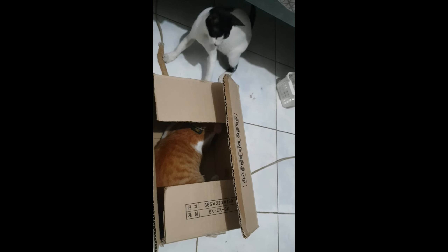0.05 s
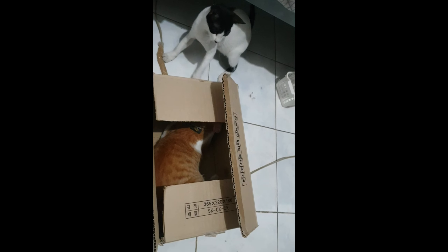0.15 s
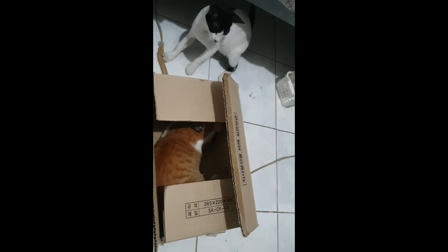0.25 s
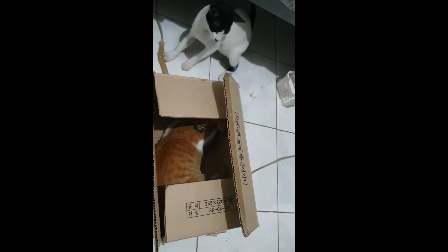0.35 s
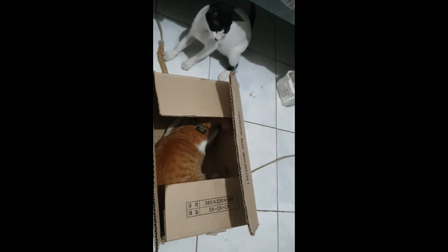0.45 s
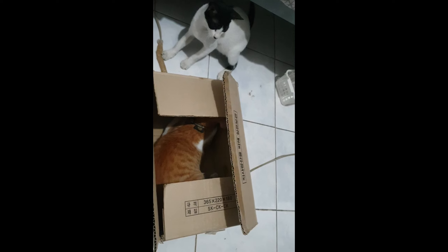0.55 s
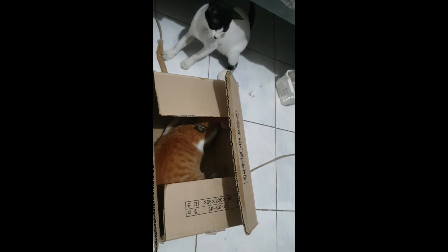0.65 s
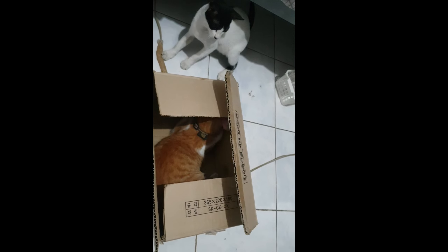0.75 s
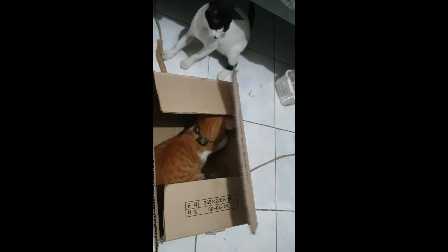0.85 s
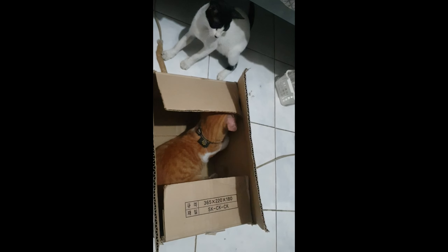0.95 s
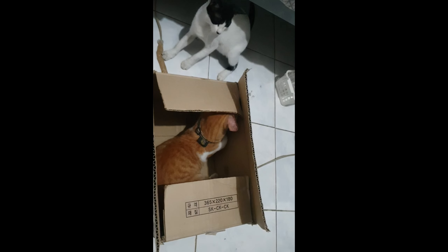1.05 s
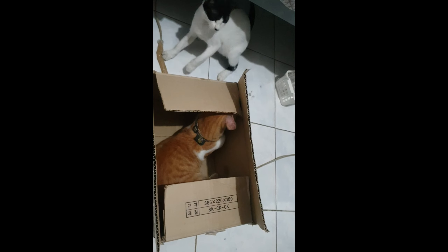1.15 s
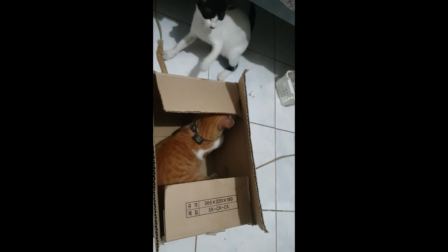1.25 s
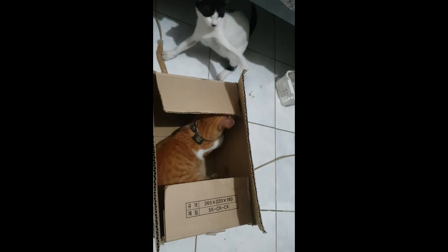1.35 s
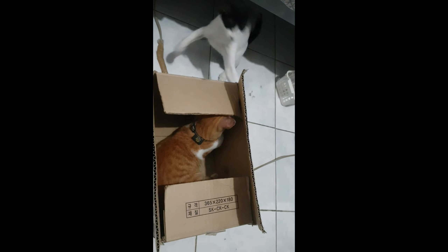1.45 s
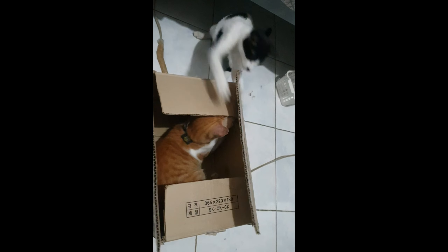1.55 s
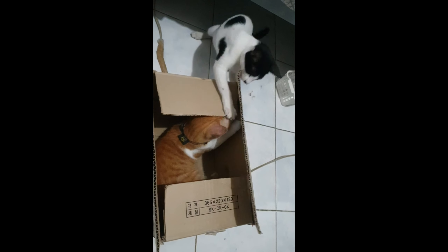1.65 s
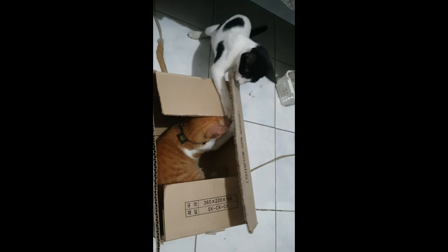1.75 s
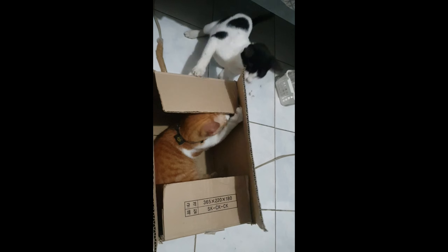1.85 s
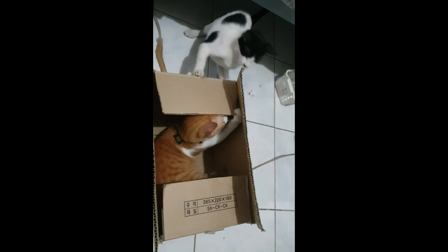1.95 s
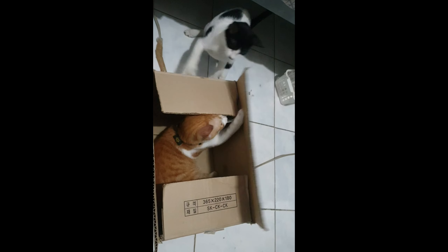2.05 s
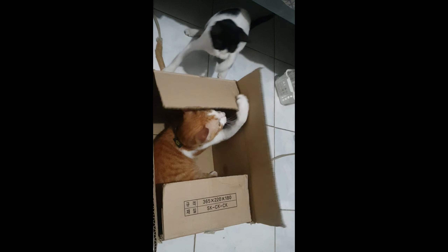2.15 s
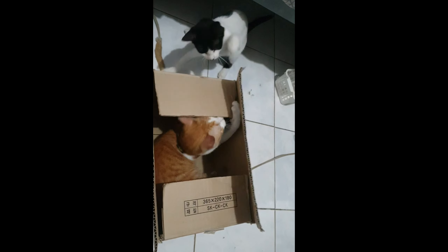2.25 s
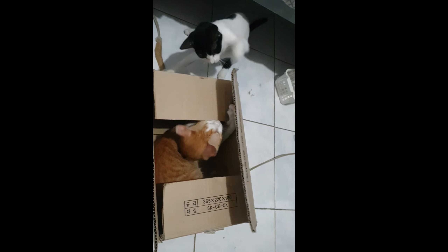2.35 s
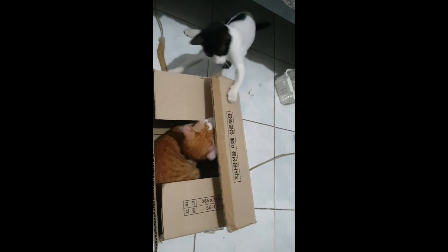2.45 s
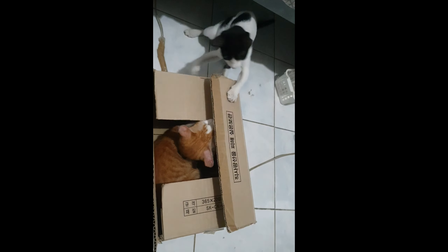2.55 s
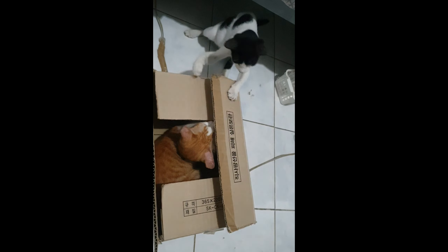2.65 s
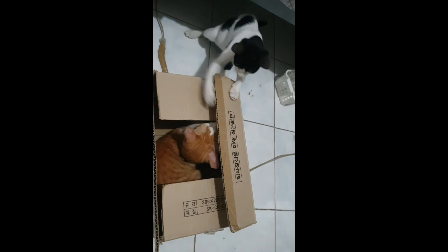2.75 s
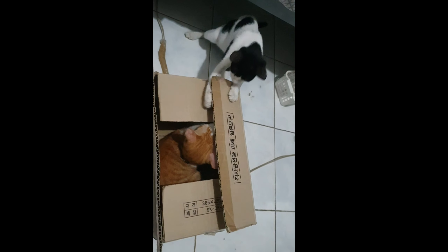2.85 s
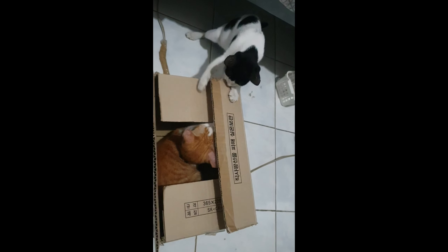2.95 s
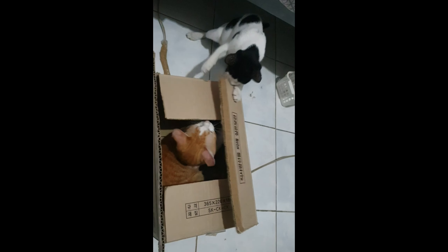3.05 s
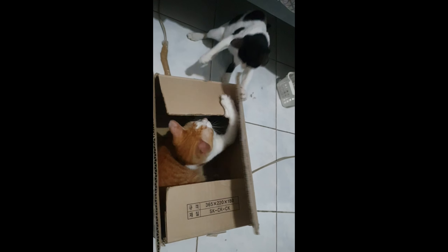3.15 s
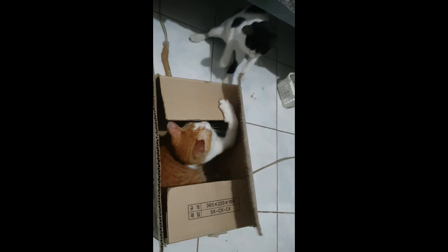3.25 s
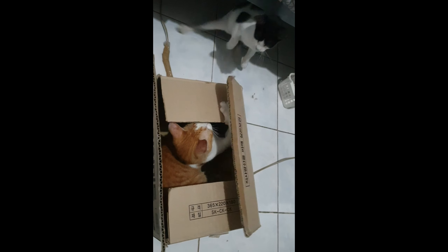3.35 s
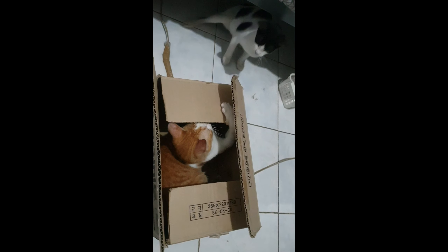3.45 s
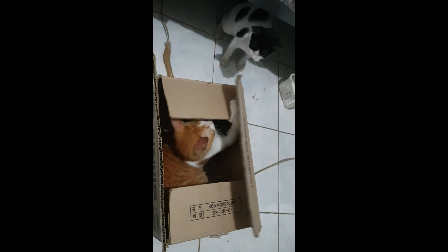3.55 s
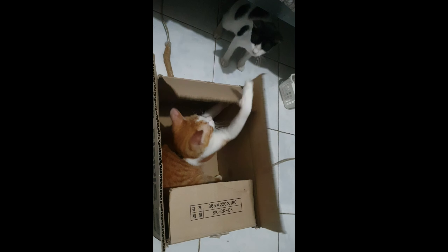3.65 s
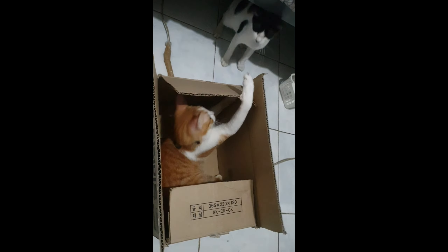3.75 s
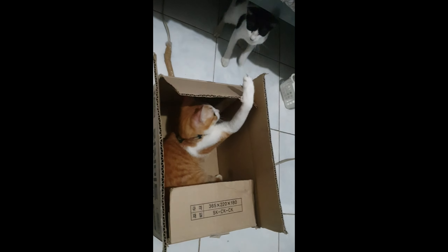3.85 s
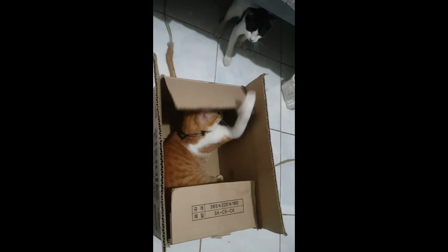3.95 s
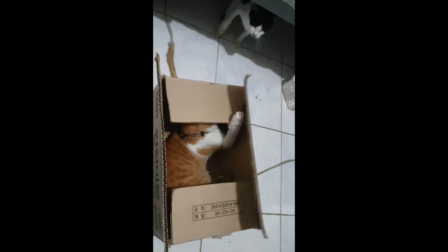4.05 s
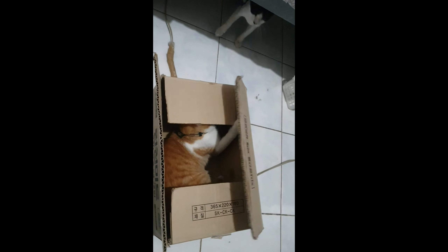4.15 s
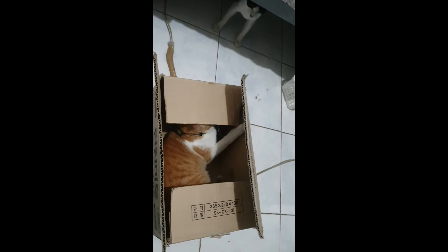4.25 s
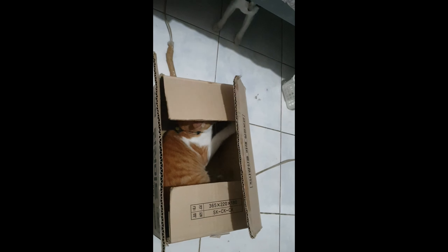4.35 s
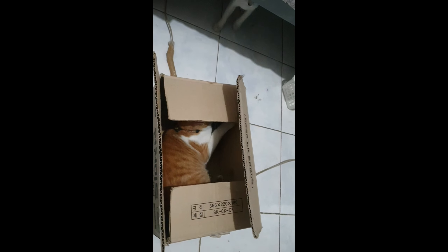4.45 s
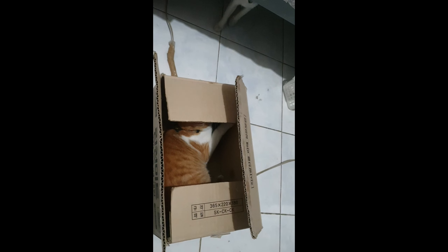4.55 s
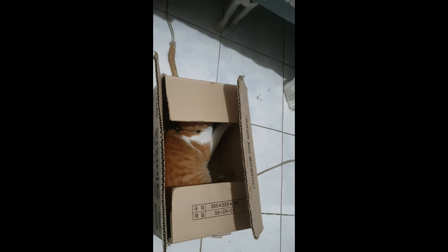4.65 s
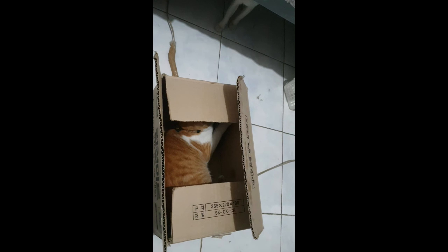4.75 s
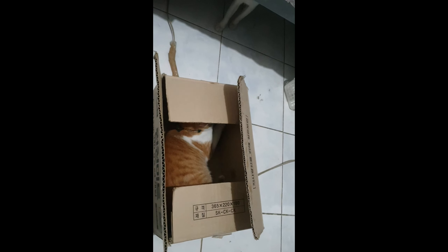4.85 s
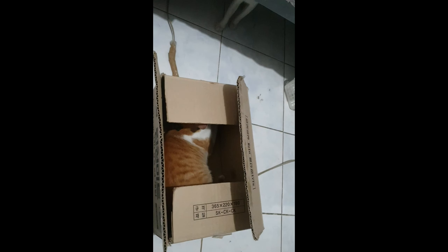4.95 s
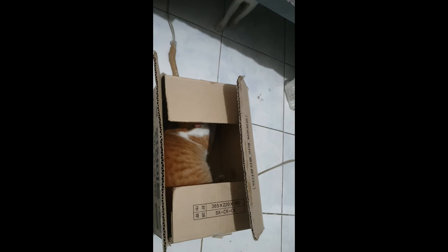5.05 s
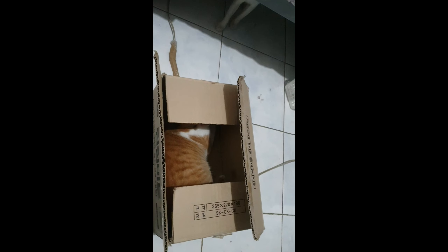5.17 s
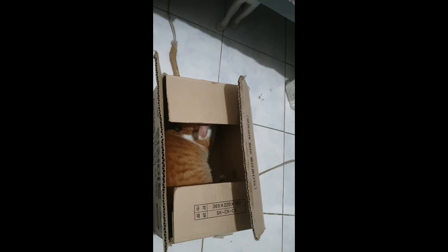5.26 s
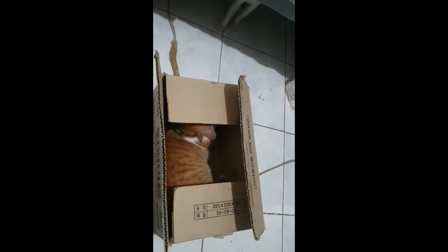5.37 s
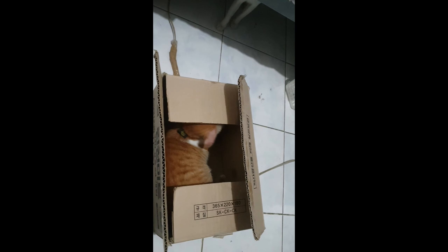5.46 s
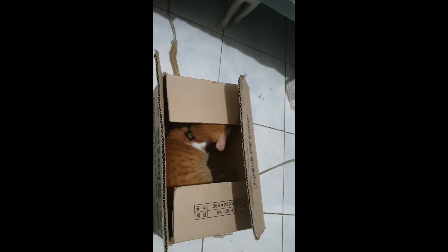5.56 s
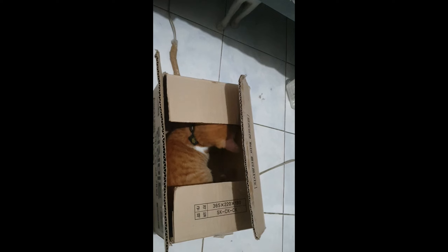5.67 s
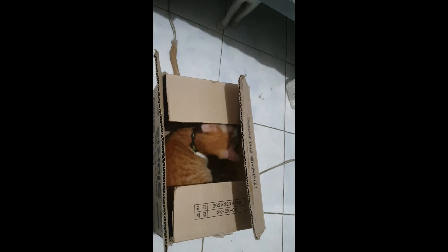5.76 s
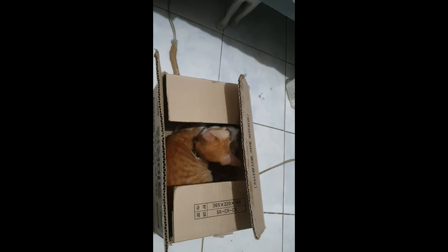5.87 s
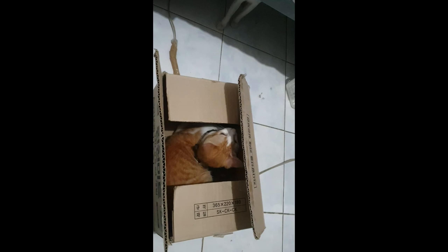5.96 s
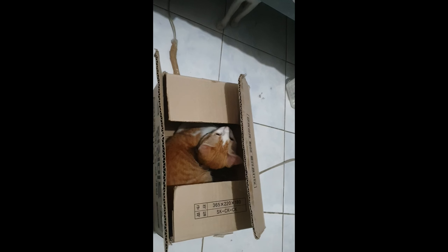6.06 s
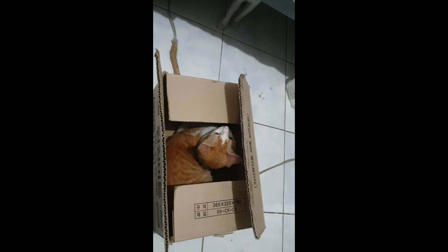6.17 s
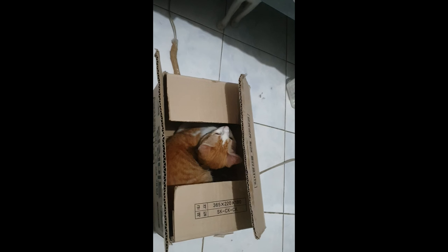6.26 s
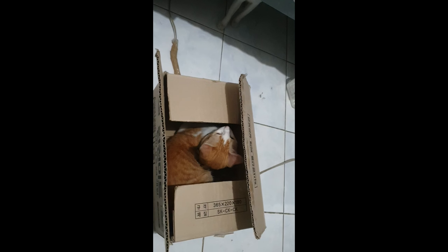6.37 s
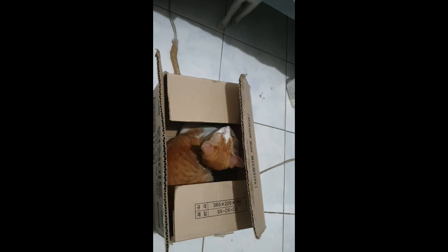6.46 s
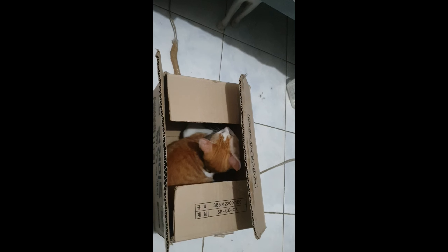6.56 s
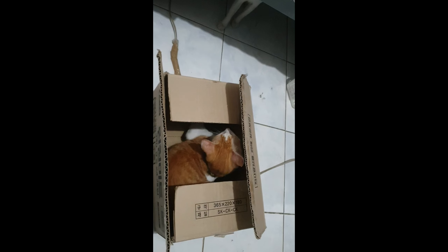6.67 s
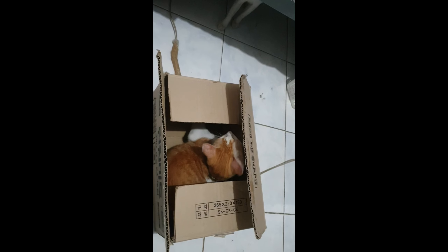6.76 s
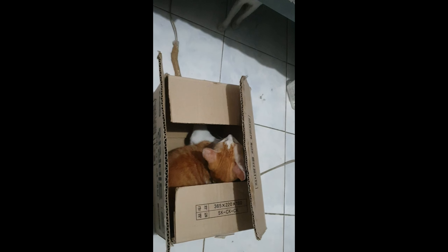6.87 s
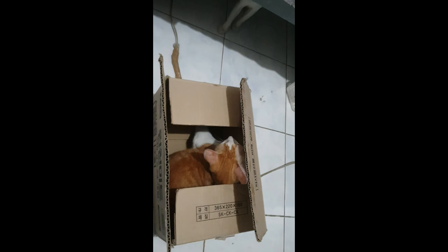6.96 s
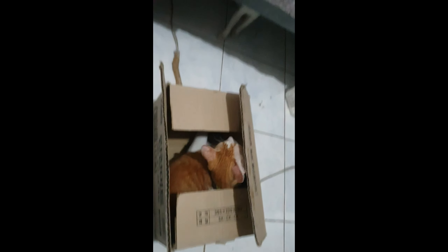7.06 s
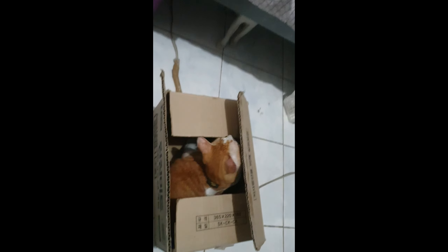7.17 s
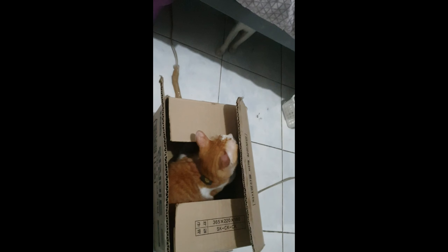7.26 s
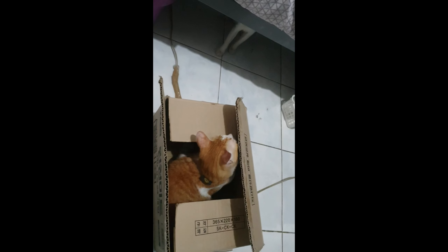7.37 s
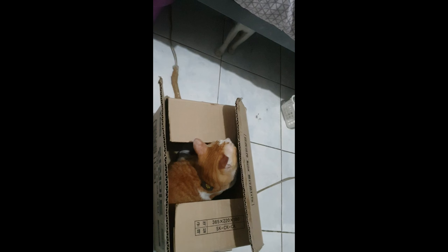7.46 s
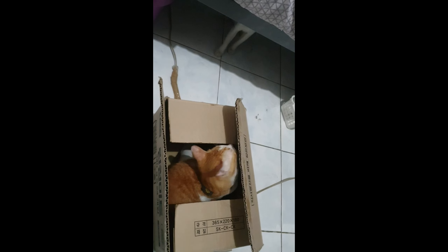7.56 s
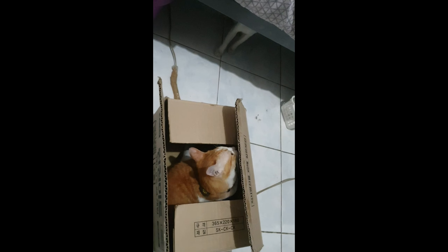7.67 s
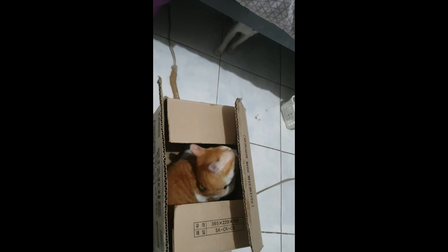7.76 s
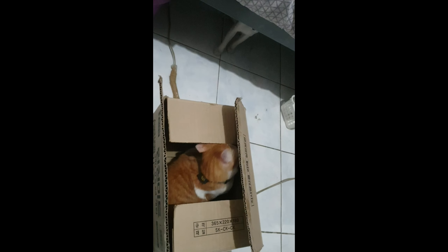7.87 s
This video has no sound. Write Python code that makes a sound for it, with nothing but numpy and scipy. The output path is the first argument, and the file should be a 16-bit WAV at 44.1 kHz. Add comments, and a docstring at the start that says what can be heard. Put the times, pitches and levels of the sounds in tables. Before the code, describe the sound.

Two cats play at a cardboard box on a tiled floor. After a quiet start, sharp scrapes, flap slaps and hollow thumps come in quick irregular bursts, strongest in the first three seconds, then thin out to separate bumps and soft rustles. Faint high insects trill outside over low rumble. Close stereo pickup, short hard-room echo.

```python
"""Two cats paw, rub and bump a cardboard box: fur and claws drag over the paper face as showers of tiny snaps,
coloured by the paper, its ribs and the rattling walls. Blows ring the walls and the hollow box, claw tips tick
and a sliding flap edge squeaks. Echoes of the tiled room follow as dying noise. Behind it, throbbing noise makes
insects trill outside and shaped noise makes a low rumble. Two microphone ports a few cm apart hear it in stereo."""
import sys
import numpy as np
from scipy import signal
from scipy.fft import rfft, irfft, next_fast_len
from scipy.io import wavfile

SR = 44100
rng = np.random.default_rng(int(sys.argv[2]) if len(sys.argv) > 2 else 0)


def transcribe(u):
    """Save the signal u as a 16-bit wav file named by the first command-line argument.

    u: samples, shape (n,) or (channels, n), limited to [-1, 1]; the rate is SR.
    q: integer samples, one column per channel.
    """
    v = np.clip(np.atleast_2d(u).T, -1, 1)
    q = np.round(v * 32767).astype(np.int16)
    wavfile.write(sys.argv[1], SR, q)


N = 348831
T = np.arange(N) / SR   # time of every sample, s
PORTS = np.array([[1], [-1]])   # opposite signs for the left and right port

# paws and flaps hitting the box: start_s, slap_level_db [dB], slap_centre_hz [Hz], thump_level_db [dB],
# thump_centre_hz [Hz], scuff_peak_db [dB], scuff_t60_s [s to fall by 60 dB]
BLOW_EVENTS = [(0.417, -59, 1590, -58, 134, -68, 0.12), (0.85, -24, 1030, -33, 511, -41, 0.1),
               (0.864, -24.5, 690, -39.5, 528, -24, 0.11), (0.957, -42, 781, -42, 290, -40.5, 0.24),
               (1.09, -55, 1400, -42.5, 404, -48, 0.14), (1.236, -39.5, 880, -45, 70.0, -63, 0.076),
               (1.494, -22, 870, -31, 290, -47, 0.11), (1.645, -20.5, 910, -30, 275, -28, 0.089),
               (1.652, -38, 756, -27, 139, -50, 0.1), (1.729, -27, 780, -41, 126, -33, 0.055),
               (1.822, -43, 1330, -39.5, 143, -42, 0.075), (2.129, -40, 750, -35, 175, -44, 0.077),
               (2.228, -42.5, 1060, -41, 75.4, -63, 0.1), (2.452, -34, 2100, -27, 610, -24, 0.14),
               (2.484, -22.5, 1850, -18.5, 123, -47, 0.071), (2.512, -31, 1890, -26, 81.5, -54, 0.078),
               (2.707, -29.5, 2430, -52, 145, -55, 0.11), (2.745, -37, 706, -43, 519, -63, 0.1),
               (2.823, -36.5, 1200, -35, 126, -43, 0.12), (2.937, -40, 751, -42.5, 151, -50, 0.1),
               (3.075, -40, 756, -41.5, 282, -43, 0.15), (3.162, -43, 705, -36.5, 79, -51, 0.15),
               (3.356, -54, 1190, -46.5, 407, -61, 0.062), (3.522, -46.5, 1400, -64, 75.4, -60, 0.1),
               (3.774, -39.5, 1040, -40.5, 79.4, -45, 0.1), (3.834, -36, 860, -41.5, 70.0, -53, 0.092),
               (4.096, -40, 832, -44.5, 344, -41, 0.14), (4.138, -47, 1010, -34.5, 364, -49, 0.11),
               (4.16, -25.5, 746, -33, 363, -49, 0.1), (4.351, -55, 2500, -45.5, 568, -53, 0.13),
               (4.851, -49, 972, -53, 143, -53, 0.14), (4.952, -31, 890, -36, 127, -35, 0.11),
               (4.985, -31, 703, -53, 129, -42, 0.1), (5.006, -31, 1480, -41.5, 69.6, -39, 0.11),
               (5.31, -59, 880, -67, 61.9, -65, 0.1), (5.32, -43, 800, -68, 127, -66, 0.1),
               (5.371, -47.5, 870, -76, 72.7, -70, 0.1), (5.736, -39, 760, -26, 212, -71, 0.1),
               (5.824, -28, 1280, -33, 152, -51, 0.1), (6.419, -40, 1900, -50.5, 283, -72, 0.085),
               (7.862, -44.5, 1330, -52, 150, -60, 0.1)]
# small bending modes of the walls: pitch_hz [Hz], width_hz [Hz], level_db [dB]
WALL_MODES = [(493.5, 52, 6), (576, 86, 1), (626.5, 90, 1), (709, 76, -1), (787, 165, 0), (923, 68, -0.5),
              (1025, 70, -1), (1186, 110, 1), (1321, 90, 4.5), (1439, 52, 3), (1551, 95, 4),
              (1680, 260, -1.5)]
# ribs of the paper face: pitch_hz [Hz], width_hz [Hz], level_db [dB]
RIB_MODES = [(1752, 230, 4.5), (2104, 230, 4), (2345, 236, 1.5), (2646, 248, 1), (2914, 260, 0),
             (3420, 640, 3), (3920, 500, 6.5), (4520, 630, 11)]


def amp(db):
    """Turn decibels into a gain."""
    return 10 ** (np.asarray(db) / 20)


def rms_one(x):
    """Scale a sound so that its average strength (rms) is 1."""
    return x / np.sqrt(np.mean(x ** 2) + 1e-20)


def at_hz(points, hz):
    """Read a table between its points, with pitch on a log axis as the ear hears it."""
    points = np.array(points)
    return np.interp(np.log(hz), np.log(np.maximum(points[:, 0], 1)), points[:, 1])


def drift(rate):
    """Slow random wander around 0: straight lines between chance values, `rate` of them per second."""
    knots = rng.standard_normal(int(N / SR * 100) + 2)
    return np.interp(T * np.clip(rate, .1, 99), np.arange(len(knots)), knots) * 0.78


def grains(per_s, spread_db):
    """Random fibre snaps: single-sample clicks of uneven size and either sign; rms 1."""
    sizes = amp(spread_db * np.minimum(rng.exponential(1, N), 4)) * rng.choice([-1, 1], N)
    happens = rng.random(N) < per_s / SR
    return rms_one(sizes * happens + 1e-9)


def resonances(x, table):
    """Side-by-side resonances (pitch in Hz, width in Hz, level in dB), added with alternating signs."""
    out = 0
    for k, (hz, width, db) in enumerate(table):
        r = np.exp(-np.pi * max(width, 5) / SR)   # a wide resonance loses energy fast
        b = (1 - r * r) / 2 * np.array([1, 0, -1])
        a = [1, -2 * r * np.cos(2 * np.pi * hz / SR), r * r]
        out = out + (-1) ** k * amp(db) * signal.lfilter(b, a, x)
    return out


def ring(clicks, hz, t60):
    """A click of height 1 sets a sine of height 1 ringing, which falls 60 dB in t60 seconds."""
    r = amp(-60 / (max(t60, .002) * SR))
    w = 2 * np.pi * hz / SR
    return signal.lfilter([0, np.sin(w)], [1, -2 * r * np.cos(w), r * r], clicks + 1e-18)


def shaped(x, spectrum):
    """Colour a noise by a table of pitch in Hz and level in dB; rms 1."""
    size = next_fast_len(N)
    hz = np.maximum(np.arange(size // 2 + 1) * SR / size, 1)
    coloured = rfft(x, size) * amp(at_hz(spectrum, hz))
    return rms_one(irfft(coloured, size)[..., :N])


def bursts(levels_db, t60s):
    """Loudness curve that jumps up at each blow and dies away as friction ends."""
    env = np.zeros(N)
    for row, db, t60 in zip(BLOW_EVENTS, levels_db, t60s):
        i = round(row[0] * SR)
        t = T[:min(N - i, SR // 2)]
        rise = np.minimum(t / 0.00099, 1)   # about 1 ms
        env[i:i + len(t)] += amp(db - 60 * t / max(t60, .01)) * rise
    return env


def pair(source, likeness):
    """Two ports hear partly unrelated versions of a source: a shared part plus one of opposite signs."""
    c = np.clip(likeness, 0, 1)
    shared = np.sqrt(1 + c) * source()
    opposed = np.sqrt(1 - c) * source() * PORTS
    return (shared + opposed) / np.sqrt(1 + c)


def nearness(hz, centre, reach_oct):
    """A mode answers less the further it lies from the colour of the touched spot: 10 dB per reach."""
    return amp(-10 * np.abs(np.log2(hz / centre)) / reach_oct)


def rubbed(modes, per_s, centre, reach_oct, patchy_db):
    """Snaps shake each mode in turn as the contact wanders; the overall level is evened out."""
    snaps = grains(per_s, 3.2)
    out, power = 0, 0
    for k, (hz, width, db) in enumerate(modes):
        share = nearness(hz, centre, reach_oct) * amp(db + patchy_db * drift(14))
        sprung = resonances(snaps, [(hz, 4 * width, 0)])   # a wider stage steepens the skirts
        out = out + (-1) ** k * share * rms_one(resonances(sprung, [(hz, width, 0)]))
        power = power + share ** 2
    return out / np.sqrt(power)


def room_tone():
    """Low rumble and hiss: shaped noise that wavers gently, alike in both ports only in the bass."""
    # background noise colour: pitch_hz [Hz], level_db [dB per Hz, relative]
    air_colour = [(20, -10), (40, -5.5), (60, 2.5), (85, -2.5), (130, -7.5), (200, -8.5), (300, -14),
                  (470, -25), (800, -28.5), (4000, -37), (8000, -45), (9000, -62), (10500, -33),
                  (15800, -34.5)]
    # how alike the ports are: pitch_hz [Hz], likeness [1 = same, 0 = unrelated]
    air_likeness = [(60, 0.9), (240, 0.91), (950, -0.02), (3770, -0.038), (15000, -0.076)]
    # balance of the ports: pitch_hz [Hz], left_minus_right_db [dB]
    air_balance = [(60, -6), (240, -6), (950, -3), (3770, -1.5), (15000, -1.5)]
    mean_level_db = -63
    size = next_fast_len(N)
    hz = np.maximum(np.arange(size // 2 + 1) * SR / size, 1)
    mid, side = rfft(rng.standard_normal((2, size)))
    c = np.clip(at_hz(air_likeness, hz), -1, 1)
    lean_db = at_hz(air_balance, hz) / 2
    both = np.sqrt(1 + c) * mid + np.sqrt(1 - c) * side * PORTS
    both = both * amp(at_hz(air_colour, hz) + lean_db * PORTS)
    return amp(mean_level_db + 1.8 * drift(5)) * rms_one(irfft(both, size)[:, :N])


def insects():
    """Insect wings outside: high noise beats in quick pulses, about six to each slower throb."""
    # colour of the wings: pitch_hz [Hz], level_db [dB per Hz, relative]
    wing_colour = [(5700, -30), (6200, -17), (6800, -12), (7150, -4), (7480, 0), (7750, -4), (7950, -11),
                   (8300, -30), (9000, -50)]
    trill_db, left_minus_right_db = -67.5, -5   # level before the throb and pulses
    throb_hz, throb_top_s, pulse_hz = 8.53, 3.851, 50.8
    throb = amp(3.3 * np.cos(2 * np.pi * throb_hz * (T - throb_top_s)))
    pulses = amp(1.8 * np.cos(2 * np.pi * pulse_hz * T + drift(2)))   # the beat wanders a little
    wings = shaped(rng.standard_normal((2, N)), wing_colour)
    return amp(trill_db) * amp(left_minus_right_db / 2 * PORTS) * throb * pulses * wings


def room(x):
    """Echoes of the tiled walls: a dying noise tail of its own for each port, with a decay per pitch band."""
    # room decay: band_hz [Hz], t60_s [s to fall by 60 dB]
    room_decay = [(150, 0.16), (600, 0.2), (2500, 0.24), (9000, 0.17)]
    t, tail = T[:SR // 2], 0
    for hz, t60 in room_decay:
        band = signal.butter(2, [hz / 1.31, hz * 2.2], "band", fs=SR, output="sos")
        noise = signal.sosfilt(band, rng.standard_normal((2, len(t))))
        tail = tail + noise * amp(-60 * t / t60)
    tail = tail * np.clip(t / 0.003 - .4, 0, 1)   # the first walls answer after a few ms
    tail = tail / np.sqrt(np.sum(tail ** 2) / 2)
    return signal.fftconvolve(x, tail, axes=1)[:, :N]


def squeaks():
    """A flap edge sings as it slides: noise twice through a narrow resonance, swelling and fading."""
    # squeaks: peak_s [s], level_db [dB], pitch_hz [Hz], length_s [s]
    flap_squeaks = [(6.85, -55, 2830, 0.07), (4.9, -56, 620, 0.08)]
    out = np.zeros(N)
    for s, db, hz, length in flap_squeaks:
        narrow = [(hz, 170, 0)]
        tone = resonances(resonances(rng.standard_normal(N), narrow), narrow)
        out += amp(db) * rms_one(tone) * np.exp(-(2 * (T - s) / length) ** 2)
    return out


def ticks():
    """Each claw tip that catches gives a few ms of noise, coloured around its pitch."""
    # claw tips catching: start_s [s], peak_db [dB], pitch_hz [Hz]
    claw_catches = [(0.8508, -38, 2100), (1.2373, -34, 6400), (1.4406, -44, 6200), (1.4514, -47, 7160),
                    (1.4621, -44, 11000), (1.4724, -40, 11800), (1.484, -35, 11400), (1.5714, -35, 6600),
                    (1.6447, -36, 2340), (2.228, -40, 6700), (2.304, -39, 11400), (2.3605, -30, 6600),
                    (2.437, -43, 7100), (2.453, -33, 6800), (2.822, -38, 7060), (3.346, -29, 6760),
                    (3.356, -33, 7940), (3.3674, -45, 7900), (4.7282, -48.5, 7500), (4.9457, -29, 6000),
                    (5.8336, -30.5, 2150), (7.062, -43, 7190)]
    out, t = np.zeros(N), T[:600]
    for (s, db, hz), noise in zip(claw_catches, rng.standard_normal((len(claw_catches), 600))):
        noise[0] = 6.2   # each catch starts with one hard sample, a sharp edge
        click = resonances(noise * amp(-60 * t / 0.0076), [(hz, 0.052 * hz, 0)])
        i = round(s * SR)
        out[i:i + 600] += amp(db) * click / np.abs(click).max()
    return out


def slaps():
    """The sharp edge of each blow rings the small wall modes and ribs near the struck spot's colour."""
    share_db = -6.5   # part of a blow that one mode takes up
    s, db, centre = np.transpose(BLOW_EVENTS)[:3]
    modes = WALL_MODES + RIB_MODES
    at = np.round(s * SR).astype(int)
    luck = rng.normal(0, 1, (len(BLOW_EVENTS), len(modes)))
    out = np.zeros(N)
    for k, (hz, width, mode_db) in enumerate(modes):
        clicks = np.zeros(N)
        strength = amp(db + mode_db + share_db + 2 * luck[:, k])
        clicks[at] = strength * nearness(hz, centre, 0.36) * (-1) ** k
        out += ring(clicks, hz, np.log(1000) / (np.pi * width))   # a wide mode dies sooner
    dull = signal.butter(3, 2600, fs=SR, output="sos")   # cardboard gives, so the edge is dull
    return signal.sosfilt(dull, out)


def box(rumble_db, reach_oct, soft_hz):
    """Blows ring the hollow box's modes near the struck spot; dragging shakes them all with coarse grains."""
    # air and large panels of the box: pitch_hz [Hz], level_db [dB], t60_s [s to fall by 60 dB after a blow]
    box_modes = [(59.2, 1.5, 0.36), (77.6, 3.5, 0.21), (98.5, -1.5, 0.2), (126.7, 2.5, 0.26),
                 (169.6, 0.5, 0.19), (183.5, -5, 0.16), (207.7, 2, 0.15), (236, -3, 0.15), (256, 0.5, 0.14),
                 (286.5, 0, 0.21), (338, 4.5, 0.12), (369.6, 1.5, 0.13), (404, 0, 0.18), (450, -3.5, 0.11),
                 (503, -4.5, 0.14), (565, -8, 0.18)]
    share_db = -6   # part of a blow that one mode takes up
    s, db, centre = np.transpose(BLOW_EVENTS)[[0, 3, 4]]
    at = np.round(s * SR).astype(int)
    luck = rng.normal(0, 1, (len(BLOW_EVENTS), len(box_modes)))
    thumps, rumble, shake = np.zeros(N), np.zeros(N), grains(250, 2.73)
    for k, (hz, mode_db, t60) in enumerate(box_modes):
        clicks = np.zeros(N)
        strength = amp(db + mode_db + share_db + 2 * luck[:, k])
        clicks[at] = strength * nearness(hz, centre, reach_oct) * (-1) ** k
        thumps += ring(clicks, hz, t60)
        rumble += amp(mode_db) * ring(shake, hz, 0.44 * t60) * (-1) ** k   # dragging rings shorter
    pad = np.exp(-2 * np.pi * soft_hz / SR)   # paw pads soften the contact
    soft_thumps = signal.lfilter([1 - pad], [1, -pad], thumps)
    return soft_thumps + amp(rumble_db) * rms_one(rumble)


def strokes():
    """All strokes' power adds up: curves of hiss, rasp, rattle and rumble in dB, and of rattle centre in Hz."""
    # strokes of paw, fur or flap; swell and fade are the times for a 20 dB change:
    # peak_s [s], swell_s [s], fade_s [s], fur_hiss_db [dB], claw_rasp_db [dB], wall_rattle_db [dB],
    # rattle_centre_hz [Hz], box_rumble_db [dB]
    stroke_events = [ (.104, 0.092, 0.22, -75, -84, -97, 530, -77),
                     (.424, 0.054, 0.15, -64, -68, -69, 664, -65.5),
                     (.6, 0.21, 0.17, -80, -84, -79.5, 520, -65.5),
                     (.828, 0.11, 0.025, -66, -68.5, -66.5, 1050, -62),
                     (0.852, 0.0024, 0.067, -43, -48, -32.5, 534, -62),
                     (0.89, 0.04, 0.061, -35.5, -42, -42.5, 550, -58.5),
                     (.96, 0.058, 0.17, -53.5, -57, -51.5, 550, -55),
                     (1.111, .08, .06, -53, -55.5, -49.5, 855, -49.5),
                     (1.17, .05, .1, -74, -74, -63, 620, -55),
                     (1.238, .005, 0.18, -57, -65.5, -58.5, 637, -52.5),
                     (1.35, 0.42, .08, -64.5, -72, -65.5, 1010, -60),
                     (1.443, .003, 0.028, -48.5, -73, -88, 670, -72),
                     (1.49, 0.049, .015, -46.5, -66.5, -76, 743, -73),
                     (1.509, 0.017, 0.13, -43.5, -48.5, -44, 730, -45),
                     (1.647, 0.0031, 0.049, -40.5, -46.5, -34.5, 770, -51),
                     (1.684, 0.057, .1, -51, -50, -52, 774, -38.5),
                     (1.8, 0.032, 0.12, -59, -53, -53, 600, -55),
                     (1.861, .087, 0.11, -36.5, -43, -45, 1120, -49),
                     (1.907, 0.052, 0.088, -42, -46, -52, 1100, -44),
                     (2.116, 0.28, 0.043, -61, -71, -66, 587, -58.5),
                     (2.132, 0.0078, .1, -51, -54, -49.5, 500, -51),
                     (2.229, 0.0065, 0.16, -52, -57, -55.5, 670, -49),
                     (2.369, 0.089, 0.28, -53, -62, -57.5, 590, -52.5),
                     (2.454, .006, 0.061, -41, -49, -36.5, 610, -39),
                     (2.477, 0.028, .07, -33, -33.5, -37, 580, -49),
                     (2.56, 0.075, 0.15, -59, -60, -51, 523, -55),
                     (2.65, 0.23, .09, -57, -61.5, -62.5, 800, -70),
                     (2.72, 0.031, 0.27, -59.5, -57.5, -59, 575, -67),
                     (2.766, .06, .1, -60, -60, -48.5, 556, -70), (2.818, .1, .02, -59, -50, -64, 630, -58),
                     (2.824, .005, 0.083, -47, -51, -41, 560, -52),
                     (2.938, 0.0086, 0.1, -64, -61, -49.5, 686, -45.5),
                     (3.0, 0.12, 0.15, -55, -61, -58, 700, -61),
                     (3.078, 0.1, 0.23, -48.5, -56.5, -55, 696, -58),
                     (3.17, 0.13, 0.11, -63, -54, -52.5, 560, -45),
                     (3.234, 0.25, 0.046, -49, -52.5, -58.5, 1000, -49),
                     (3.346, .002, .1, -49, -78, -64, 467, -57),
                     (3.43, .06, 0.23, -66.5, -75, -64.5, 553, -59),
                     (3.523, .015, .2, -66, -75, -61.5, 1260, -63),
                     (3.6, 0.094, 0.12, -64, -67, -62, 697, -56.5),
                     (3.681, 0.067, 0.072, -39.5, -46.5, -54.5, 1270, -55),
                     (3.775, .006, 0.13, -52, -59.5, -60, 970, -50),
                     (3.847, 0.12, 0.083, -59, -61.5, -55.5, 650, -53.5),
                     (3.969, .02, .1, -55, -60, -58, 905, -68),
                     (3.993, 0.044, 0.086, -47, -53, -49, 870, -58),
                     (4.12, 0.17, 0.056, -61, -66, -61.5, 620, -61),
                     (4.143, 0.0048, 0.052, -52, -62, -43, 488, -37.5),
                     (4.172, 0.066, .09, -50, -58, -44, 485, -53),
                     (4.26, 0.16, 0.23, -54.5, -63, -69, 498, -58),
                     (4.37, 0.17, .1, -62, -64, -55.5, 570, -68),
                     (4.432, .12, 0.073, -48, -56.5, -71, 557, -59),
                     (4.66, 0.083, 0.18, -64, -78, -77, 549, -77),
                     (4.856, 0.053, 0.25, -57, -76, -67, 850, -55.5),
                     (4.95, 0.099, 0.17, -46, -51.5, -48.5, 640, -57.5),
                     (5.008, 0.0052, 0.048, -58, -48, -36.5, 1130, -53),
                     (5.028, 0.044, 0.049, -48, -44.5, -42, 1150, -46),
                     (5.148, .2, 0.091, -62, -67.5, -54, 730, -63),
                     (5.312, 0.0091, 0.18, -76, -85, -66.5, 810, -67),
                     (5.5, 0.31, 0.63, -80, -83, -75, 800, -67),
                     (5.737, .004, 0.1, -80, -85, -48, 478, -66),
                     (5.82, 0.035, .02, -57, -65, -50, 495, -60.5),
                     (5.83, 0.0054, 0.062, -50, -44.5, -39.5, 1150, -45.5),
                     (5.93, .05, 0.24, -72, -71.5, -80, 1250, -62.5),
                     (6.421, 0.0048, .085, -88, -65.5, -54, 702, -66),
                     (6.58, 0.078, 0.17, -74.5, -91, -81.5, 562, -71.5),
                     (6.79, .025, 0.3, -64.5, -82, -74, 1210, -74),
                     (6.86, 0.095, 0.067, -54.5, -60, -68, 1450, -70),
                     (6.99, 0.053, .1, -69, -76, -67.5, 854, -68),
                     (7.069, 0.026, 0.093, -57.5, -64, -70, 1370, -70),
                     (7.21, .02, 0.17, -64, -70.5, -80, 646, -75),
                     (7.256, 0.11, 0.17, -65.5, -73.5, -73.5, 900, -62),
                     (7.458, 0.13, 0.077, -70.5, -78, -78, 620, -74),
                     (7.58, 0.04, .4, -57, -60, -61, 1060, -61),
                     (7.672, .12, 0.13, -66, -60, -58.5, 1000, -62.5),
                     (7.766, 0.18, .1, -74, -65, -69, 1350, -66),
                     (7.873, 0.017, 0.22, -59, -59, -52.5, 695, -57.5)]
    # a cat shifting its weight: hiss_db, rasp_db, rattle_db, rumble_db [all dB]
    rest_db = [-96, -98, -97, -77]
    rest_hz = 550   # rattle centre at rest
    linger_db, linger_slower = -18, 2.56   # a stroke trails off this far down, this many times slower
    swell_round, fade_round = 1.24, 1   # above 1 the peak is rounded and the flanks steepen
    power = amp(rest_db)[:, None] ** 2 * np.ones(N // 32 + 1)
    t = T[::32]   # a coarse time grid is enough for slow curves
    octaves = power[2] * np.log2(rest_hz)   # rattle pitch, weighted by rattle power
    for s, swell, fade, hiss_db, rasp_db, rattle_db, hz, rumble_db in stroke_events:
        before = np.maximum(s - t, 0) / max(swell, .002)
        after = np.maximum(t - s, 0) / max(fade, .002)
        falling = np.maximum(amp(-20 * after ** fade_round), amp(linger_db - 20 * after / linger_slower))
        shape = amp(-20 * before ** swell_round) * falling
        own = (amp([hiss_db, rasp_db, rattle_db, rumble_db])[:, None] * shape) ** 2
        power = power + own
        octaves = octaves + own[2] * np.log2(hz)
    curves = (*10 * np.log10(power), 2 ** (octaves / power[2]))
    return [np.interp(T, t, curve) for curve in curves]


def fur():
    """Hair on paper: dense hiss, sparse crackle and passing colours; rms 1."""
    # colour of the hiss: pitch_hz [Hz], level_db [dB per Hz, relative]
    hiss_colour = [(2350, -33), (4000, -21.5), (4460, -9.5), (5390, -2.5), (5880, -3), (7110, 2.5),
                   (8020, -8), (10400, -2.5), (13800, -9.5), (15800, -3)]
    # fleeting colours of the paper skin: pitch_hz [Hz], width_hz [Hz], level_db [dB]
    skin_modes = [(5080, 380, -3.5), (5864, 340, 3.5), (6363, 160, 4), (7090, 880, 2.5), (9910, 1200, -4),
                  (11370, 780, 5.5), (13300, 670, 0.5)]
    crackle = amp(-14.5) * grains(200, 4.2)
    hiss = shaped(grains(9000, 3.5) + crackle, hiss_colour)
    return rms_one(hiss + amp(-5) * rubbed(skin_modes, 6000, 8000, 3.0, patchy_db=7))


def rubbing(hiss_db, rasp_db, rasp_hz, rattle_db, rattle_hz):
    """Fibre snaps under fur and claws swell with each stroke; hiss and rasp also burst at each blow."""
    scuff_crest_db = 15   # scuff peaks stand this far above their rms
    scuff_db, t60 = np.transpose(BLOW_EVENTS)[5:]
    uneven = amp(0.79 * drift(60))
    hiss = pair(fur, 0.044) * amp([[-2.2], [1.5]])
    rasp = pair(lambda: rubbed(RIB_MODES, 4000, rasp_hz, 0.87, patchy_db=6.0), 0.17) * amp(-.6 * PORTS)
    rattle = pair(lambda: rubbed(WALL_MODES, 1200, rattle_hz, 1.0, patchy_db=4.0), 0.75) * amp(.2 * PORTS)
    scuffs = bursts(scuff_db - scuff_crest_db, t60)
    fur_part = hiss * (amp(hiss_db) + scuffs)
    claw_part = rasp * (amp(rasp_db) + 0.7 * scuffs)
    return uneven * (fur_part + claw_part + rattle * amp(rattle_db))


def scene():
    """Cats at the box, with room echoes, insects and room tone, for the left and right port."""
    hiss_db, rasp_db, rattle_db, rumble_db, rattle_hz = strokes()
    # the rasp brightens as the fur hiss outweighs it: 0.05 octave per dB around 2460 Hz
    rasp_hz = 2460 * 2 ** (0.05 * np.clip(hiss_db - rasp_db, -12, 9))
    body = box(rumble_db, reach_oct=1.0, soft_hz=910) * amp(-.9 * PORTS)
    rubs = rubbing(hiss_db, rasp_db, rasp_hz, rattle_db, rattle_hz)
    cats = body + slaps() + squeaks() + rubs + ticks() * amp(-1.5 * PORTS)
    cats[1] = np.roll(cats[1], 4)   # right port 4 samples later: the box is nearer the left port
    return cats + amp(-9) * room(cats) + insects() + room_tone()


def record(dry):
    """Small ports lose the deep bass below 30 Hz, then the top above about 16 kHz is cut."""
    low_cut = signal.sosfilt(signal.butter(2, 30, "high", fs=SR, output="sos"), dry)
    top_cut = signal.cheby2(14, 70, 15800 * 1.03, fs=SR, output="sos")
    return signal.sosfilt(top_cut, low_cut)


dry = scene()
out = record(dry)
transcribe(out)
```